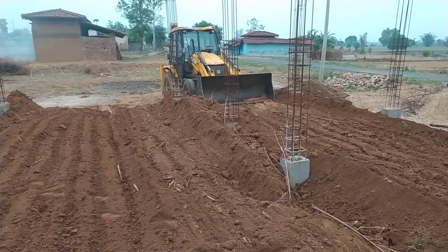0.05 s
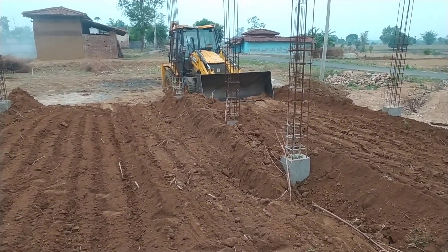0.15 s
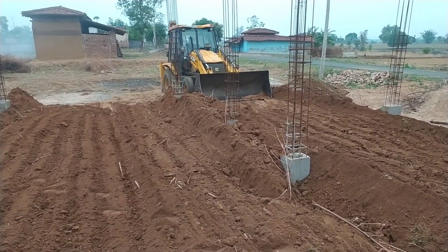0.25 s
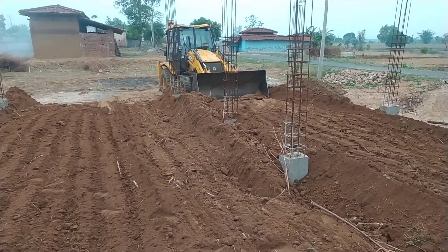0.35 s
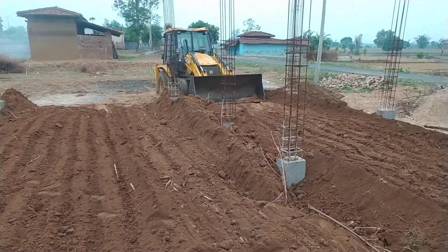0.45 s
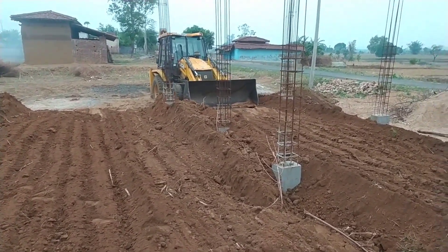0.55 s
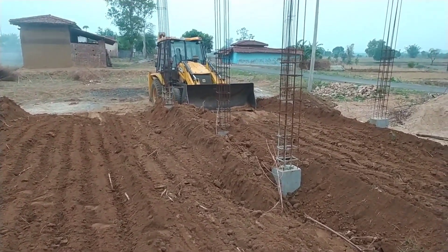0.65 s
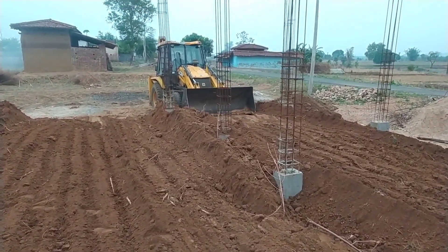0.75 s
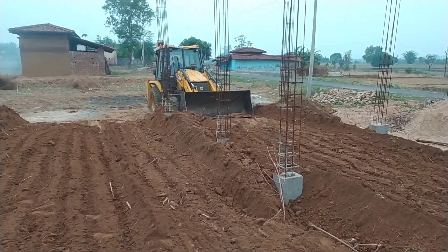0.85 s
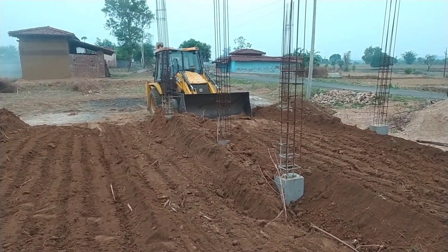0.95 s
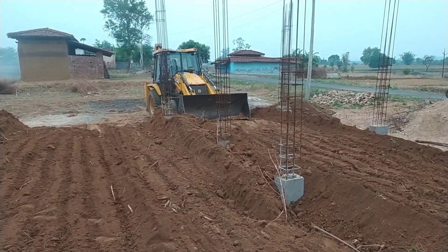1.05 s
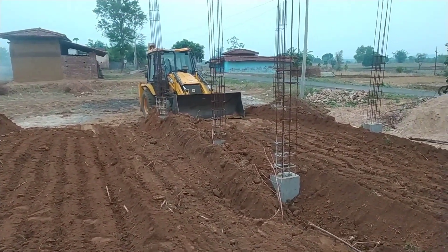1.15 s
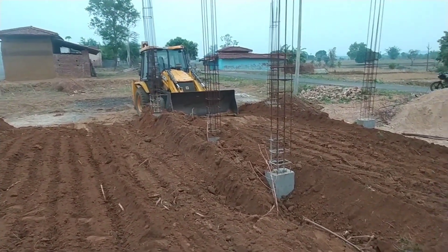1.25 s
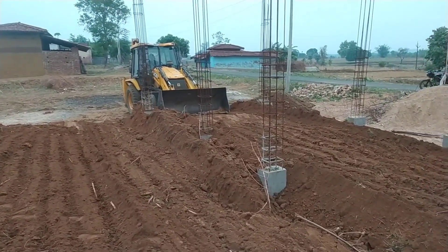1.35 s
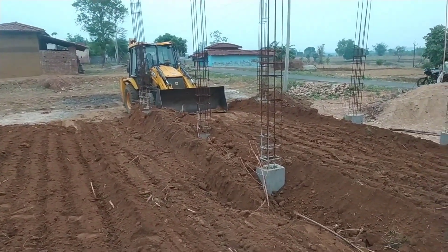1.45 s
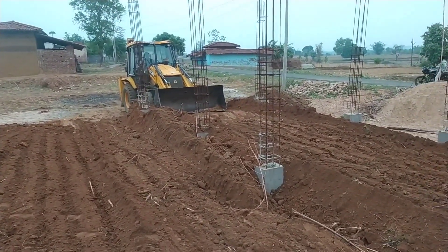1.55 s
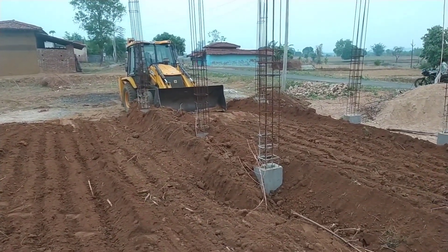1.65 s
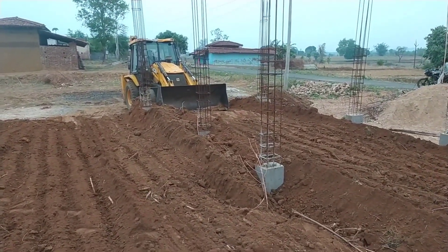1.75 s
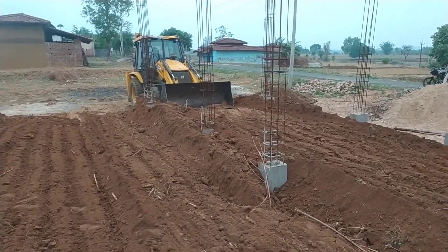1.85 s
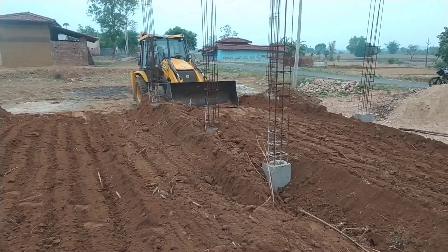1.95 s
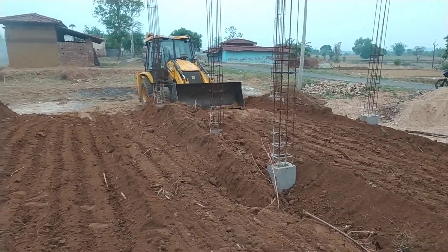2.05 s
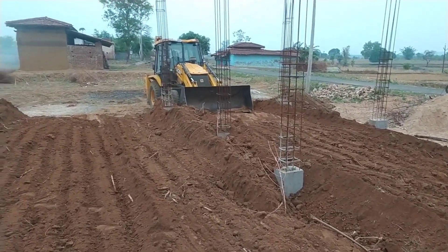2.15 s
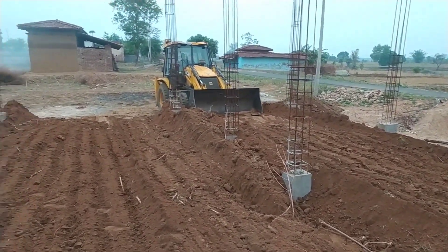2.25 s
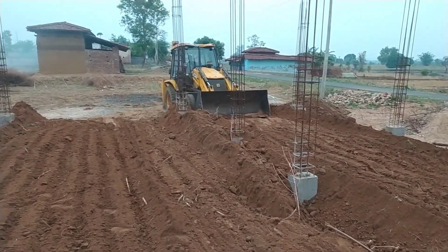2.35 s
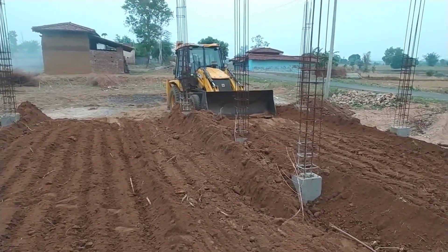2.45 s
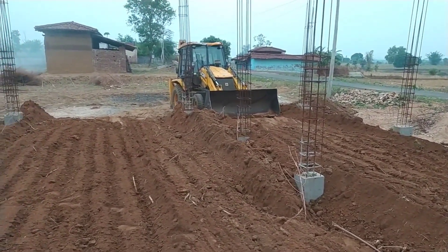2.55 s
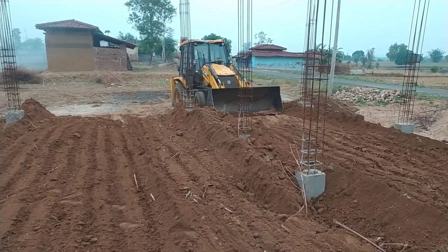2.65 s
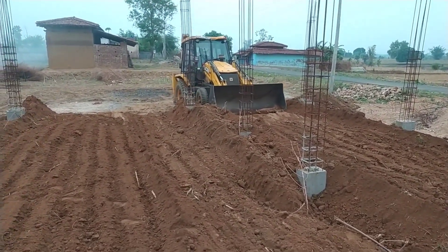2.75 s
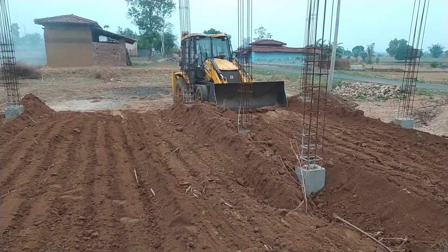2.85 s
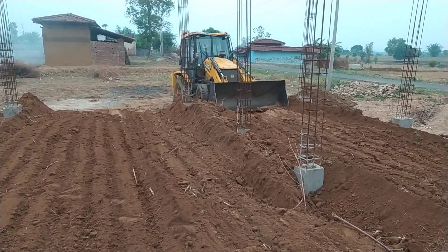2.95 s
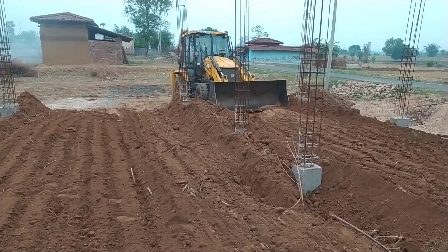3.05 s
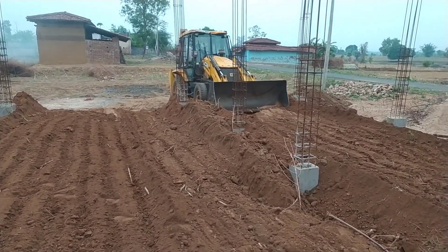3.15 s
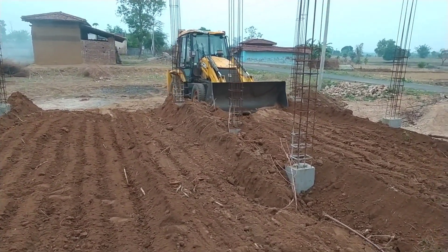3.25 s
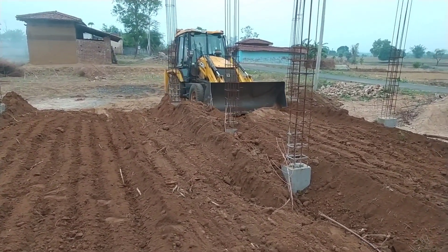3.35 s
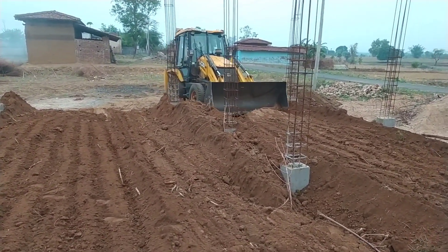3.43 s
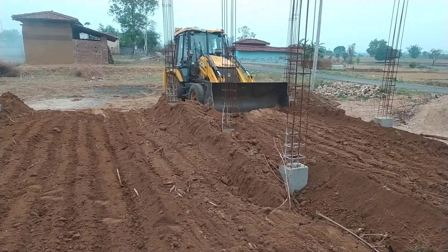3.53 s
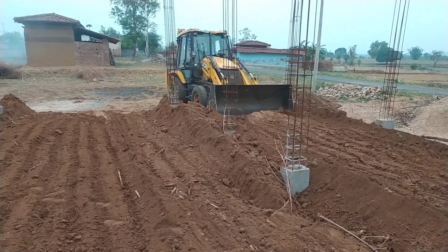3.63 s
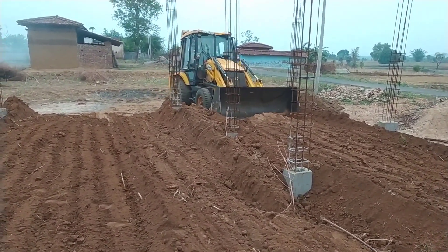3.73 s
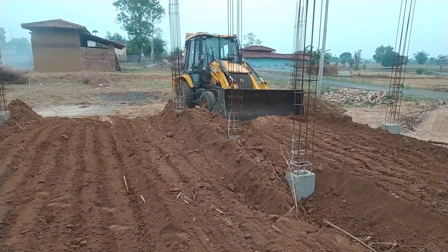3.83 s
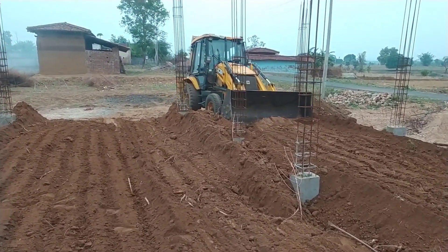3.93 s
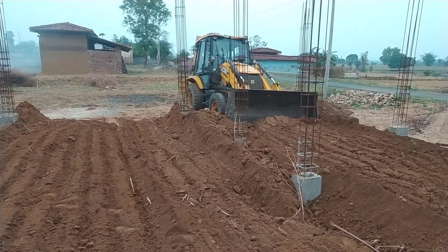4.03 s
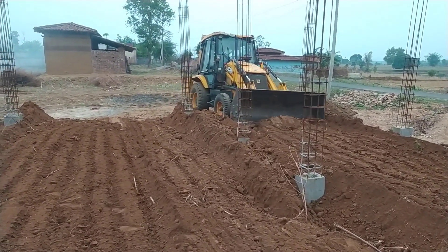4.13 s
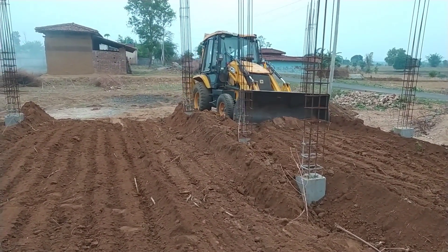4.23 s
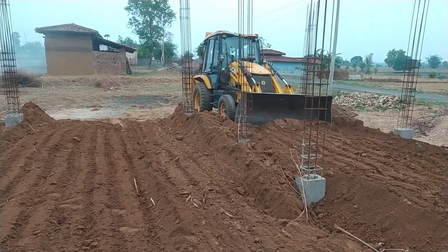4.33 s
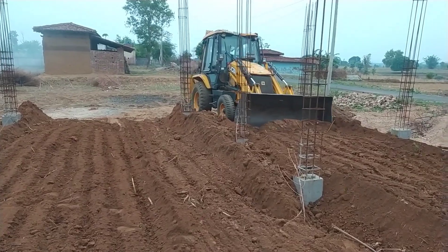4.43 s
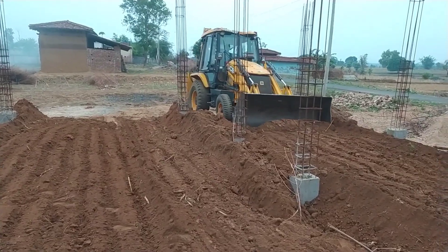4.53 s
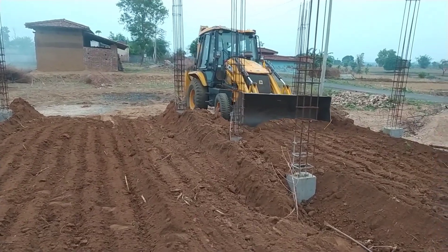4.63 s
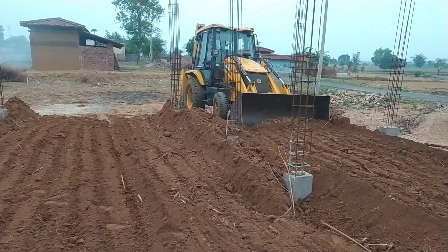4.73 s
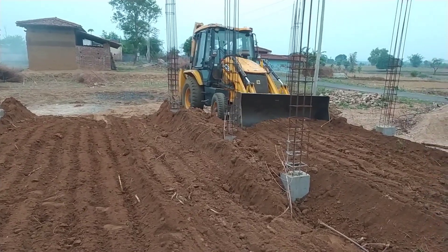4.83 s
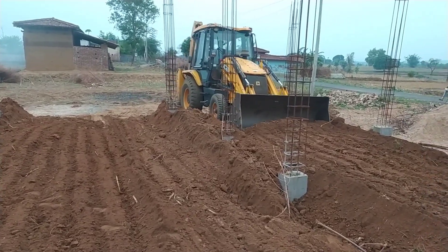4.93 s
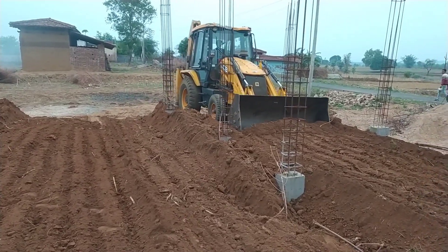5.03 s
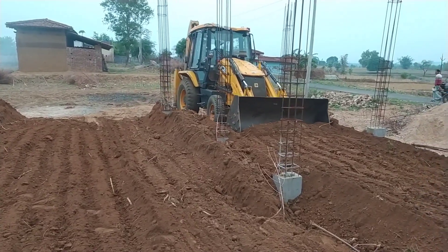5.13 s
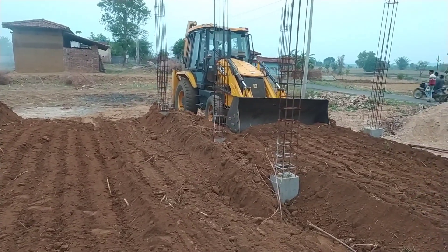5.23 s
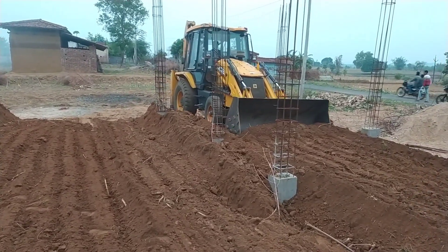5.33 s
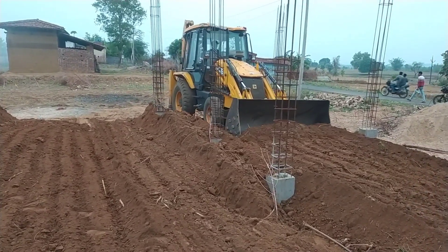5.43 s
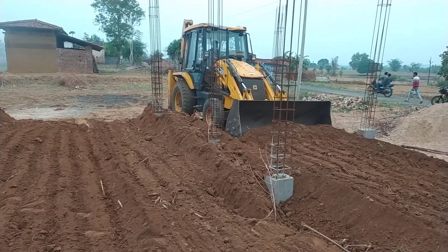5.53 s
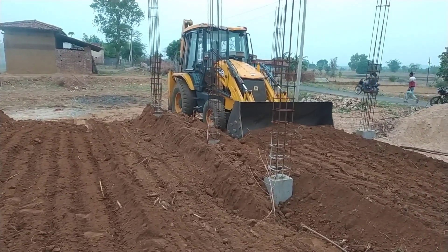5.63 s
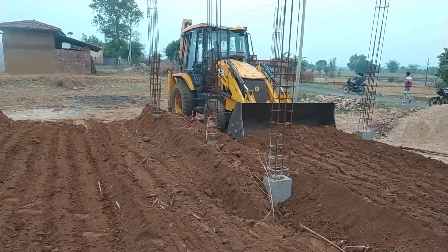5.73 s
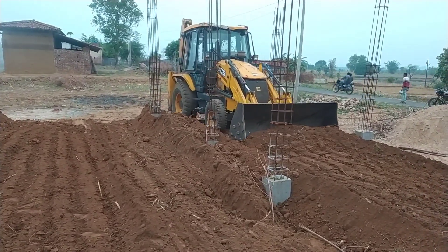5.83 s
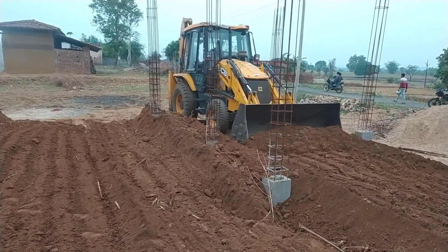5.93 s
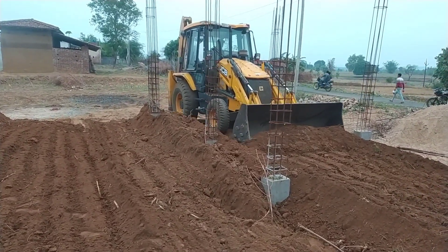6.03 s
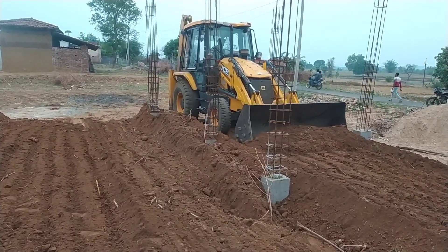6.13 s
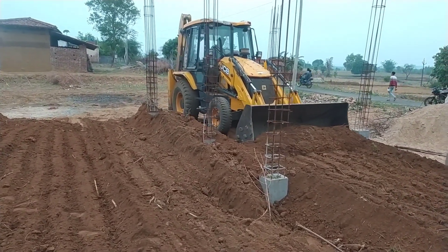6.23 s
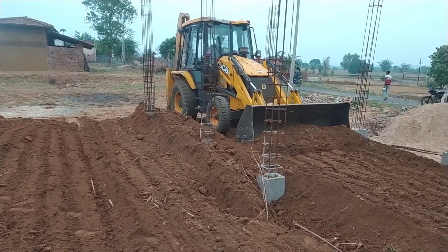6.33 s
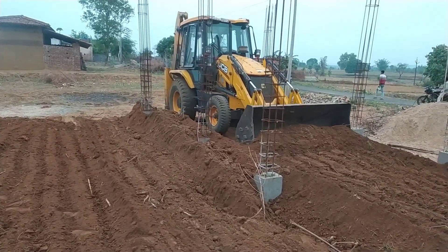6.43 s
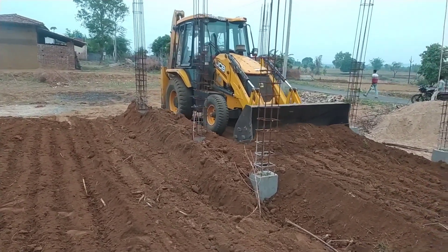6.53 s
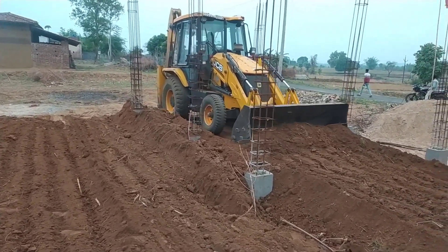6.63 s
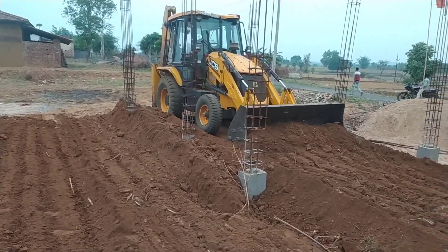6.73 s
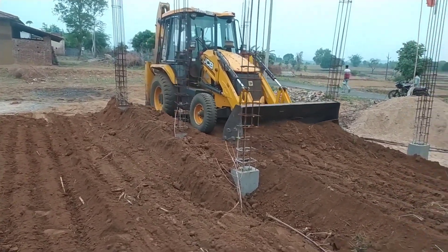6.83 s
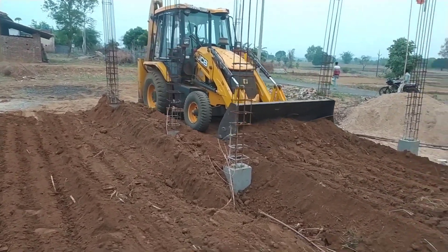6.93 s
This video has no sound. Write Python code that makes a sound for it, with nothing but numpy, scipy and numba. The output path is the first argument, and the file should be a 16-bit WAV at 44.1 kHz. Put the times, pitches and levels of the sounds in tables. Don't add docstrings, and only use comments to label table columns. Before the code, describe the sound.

A diesel loader idles with a low hum and rattle, revs up hard at two seconds, then labours closer with sharper metallic knocking.

```python
import sys
import numpy as np
from scipy import signal
from scipy.fft import rfft, irfft, next_fast_len
from scipy.io import wavfile
from scipy.ndimage import uniform_filter1d
from numba import njit

SR = 44100
rng = np.random.default_rng(int(sys.argv[2]) if len(sys.argv) > 2 else 0)


def persist_wave(psi):
    counts = np.round(np.clip(psi, -1, 1) * 32767).astype(np.int16)
    wavfile.write(sys.argv[1], SR, np.atleast_2d(counts).T)


def boost(x):
    u = np.asarray(x, float) / 20
    return 10 ** u


N = 307818
TIME = np.arange(N) / SR

# (time [s], firing rate [firings/s])
FIRING_RATE = [(0, 39.66), (0.8, 39.69), (1.4, 37.93), (1.5, 39.28), (1.845, 37.9), (1.99, 45.18),
               (2.15, 47.07), (2.4, 55.47), (2.55, 55.8), (3.15, 55.39), (3.8, 55.52), (4.87, 54.95),
               (5.0, 52.65), (5.22, 53.67), (5.53, 56.52), (5.85, 57.24), (6.6, 56.31), (6.98, 57.36)]
# (time [s], extra fuel as combustion bite [dB])
FUEL = [(0, -1), (.55, 3.5), (1.2, 0), (1.75, 0.5), (1.83, 4.5), (1.92, 7), (2.08, 4), (2.16, 5), (2.25, 8),
        (2.33, 4), (2.55, 2), (3.2, 0.5), (4.5, 0.5), (4.72, 1.5), (4.86, 3.5), (5.1, 0.2), (6.3, -.6),
        (6.98, 0.5)]
# (time [s], distance [m])
DISTANCE = [
    (0, 16.6),
    (1.75, 20.2),
    (2.7, 20.2),
    (4.2, 15.8),
    (5.0, 13.3),
    (5.9, 11.1),
    (6.98, 10.9),
]
# (time [s], frequency factor [1])
STRETCH = [(0, .93), (1.8, .93), (2.5, 1), (7, 1.005)]
IDLE_HZ, LOAD_HZ = 40, 54
REFERENCE_M = 20
DIG_S, DIG_RAMP_S = 4.7, 1

# (idle level [dB], rise under load [dB], share of approach [dB/dB], share of fuel [dB/dB],
# change when digging [dB])
HUM_LAWS = [
    (-42.5, 8.5, 0.53, 0.43, 0.9),
    (-44, 6, -0.83, 0.61, 7),
    (-41, 7, 0.42, .15, -3),
]
ROAR_LAW = (-41, 6, 0.54, 0.2, 1.5)
BONNET_LAW = (-38, 8, 1.1, .2, -0.65)
BLOCK_LAW = (-42, 11, 1.03, 0.43, -0.5)
CLATTER_LAW = (-48, 5, 0.68, 0.57, 0.9)
SPIT_LAW = (-53, 9, 1.31, 1, -0.4)

# (multiple of firing rate [1], level re the first at idle [dB], under load [dB])
UNEQUAL_LINES = [(1.25, -22, -18.5), (1.499, -16, -15.5), (1.75, -14, -51), (2.25, -30, -16),
                 (2.502, -10.5, -17), (3.249, -14, -15.5), (3.498, -26, -23), (3.75, -14, -15.5),
                 (4, -6.5, -17.5), (4.749, -7.5, -12.5), (5.252, -4, -57), (5.752, -17, -34)]
# (cylinder 1 [dB], cylinder 2 [dB], cylinder 3 [dB], cylinder 4 [dB])
CYLINDER_DB = [
    (-1, 1, -1, 1),
    (3, 1, 3, -1),
    (2, 4, 0, 1),
    (0, 0, 1, 1),
]
# (cylinder 1 [dB], 2 [dB], 3 [dB], 4 [dB])
PULLING_DB = (-1, 4.5, 1, 0)
EXHAUST_DB, IDLING_DB, BLOCK_DB, TREBLE_DB = CYLINDER_DB

# (frequency [Hz], width [Hz], level [dB])
SILENCER = [(25, 20, -11), (81.6, 78, -6), (156, 78, 2), (205.0, 59, 8.0), (285.7, 55, 3.5)]
# (frequency [Hz], width [Hz], level [dB])
BONNET = [(446, 48, 22), (510, 100, -27), (390, 150, -14)]
# (frequency [Hz], width [Hz], level [dB])
BLOCK = [(1000, 120, -13), (1020, 130, -16), (1258, 255, -4.5), (1600, 460, -17)]
# (frequency [Hz], width [Hz], level [dB])
CLATTER = [(2206, 543, 8), (2710, 130, 9), (2976, 113, 8.5), (3870, 225, -8.5)]
# (frequency [Hz], width [Hz], level [dB])
SPIT = [(4620, 410, 2), (5900, 500, 4), (6900, 700, 1), (7710, 620, 3), (9090, 3060, 1), (12100, 9000, -40)]

# (time [s], peak level [dB], ringing frequency [Hz])
KNOCKS = [(0.412, -16, 410), (0.562, -17, 410), (2.037, -10, 433), (2.142, -11, 458), (2.223, -8.5, 457),
          (2.664, -12, 390), (2.881, -11, 464), (3.274, -4.5, 1150), (3.891, -6.5, 480),
          (4.087, -14.5, 1030), (4.236, -9.5, 1010), (4.394, -15, 447), (4.541, -12, 470),
          (4.672, -8.5, 997), (4.829, -9, 457), (5.204, -5, 450), (5.280, -15, 457), (5.353, -6.5, 476),
          (5.426, -12, 486), (5.566, -6, 430), (5.779, -7, 470), (5.848, -7.5, 480), (6.198, -8, 1000),
          (6.331, -8, 480), (6.409, -4, 448), (6.479, -8.5, 428), (6.503, -6, 438), (6.552, -5, 460),
          (6.764, -11, 437), (6.904, -14, 430)]
# (time [s], peak level [dB],
# frequency [Hz], width [Hz], decay [s])
CLICKS = [(0.334, -36, 9700, 2000, 0.0067), (1.04, -41, 8000, 900, .003),
          (1.287, -29.5, 5540, 3500, 0.0018), (1.6055, -38, 9000, 2000, 0.011),
          (4.643, -29.5, 8450, 1200, 0.0091), (4.694, -15.5, 1070, 120, 0.02),
          (4.788, -25, 4000, 5000, 0.03), (4.859, -18, 1400, 1200, 0.02), (4.9168, -29.5, 8670, 250, .012),
          (4.917, -22.5, 4000, 4000, 0.0036), (5.688, -25, 2310, 500, .005)]
# (time [s], peak level [dB], frequency [Hz], width [Hz], decay [s])
PEBBLES = [
    (0.062, -32, 1680, 600, 0.013),
    (0.158, -35, 1700, 600, 0.0066),
    (0.2623, -25.5, 3940, 600, 0.0015),
    (.2624, -25, 7500, 4000, 0.00082),
    (0.2625, -25, 1990, 800, 0.0012),
    (0.331, -35.5, 3600, 1000, .002),
    (1.185, -27, 1800, 1900, 0.012),
]
# (frequency [Hz], left minus right level [dB], likeness [0-1], common level [dB])
PORTS = [(30, 1.5, 0.87, 2), (310, 1, 0.98, -0.5), (480, 3.5, 0.95, 1.5), (600, 16.5, 0.99, -4.5),
         (720, -10.5, 0, -4.5), (900, 2, 1, 2), (1530, 2.5, 0.65, -1), (1654, 13.5, 0.75, -4),
         (2090, -1.5, 0.34, -7), (4000, 0.5, 0.35, -4), (7500, 1.5, 0.06, -3), (9390, -17.5, 0.06, -3.5),
         (13100, -12.5, 0.5, -14.5), (16000, -10, .2, -15)]


def exhaust(controls, turns):
    return np.sqrt(2) * exhaust_hum(controls, turns) + exhaust_roar(controls, turns)


def exhaust_hum(controls, turns):
    load, _, _, digging = controls
    governed_hz, sag_db_per_hz = 55.7, 0.66
    order_db = [follow(law, controls) for law in HUM_LAWS]
    rate = np.gradient(turns) * SR
    order_db[0] += sag_db_per_hz * (digging > 0) * (rate - governed_hz)

    beat = 2 * np.pi * (turns - .63)
    lead = [0, 0, .5 + 2.3 * load]
    hum = np.zeros(N)
    for k, db in enumerate(order_db):
        hum -= boost(db) * np.cos((k + 1) * beat + lead[k])
    for multiple, idle_db, load_db in UNEQUAL_LINES:
        line_db = order_db[0] + idle_db + load * (load_db - idle_db)
        hum += boost(line_db) * np.cos(multiple * beat + 2 * np.pi * rng.random())
    fourth_db = order_db[0] - 7
    return hum + boost(fourth_db) * digging * np.cos(4 * beat)


def exhaust_roar(controls, turns):
    puffs = bursts(turns, 0.63, 0.13, EXHAUST_DB, 4.6, 0.81) * rng.standard_normal(N)
    roar = resonate(puffs, SILENCER, 0.876 + 0.14 * controls[0])
    return boost(follow(ROAR_LAW, controls) - 0.5) * roar


def body(controls, turns):
    load, _, fuel_db, _ = controls
    bonnet_db = follow(BONNET_LAW, controls)
    block_db = follow(BLOCK_LAW, controls)
    flutter_db = 1.1 * walk(16)
    clatter_db = follow(CLATTER_LAW, controls) + .6 * flutter_db
    spit_db = follow(SPIT_LAW, controls) + flutter_db
    steady_share = .58 - .05 * fuel_db
    stretch, = columns(STRETCH)

    idling = bursts(turns, .2, .15, IDLING_DB, 2, .45)
    pulling = bursts(turns, -.05, .24, PULLING_DB, 1.5, .6)
    bonnet = knock_hush() * (idling + load * (pulling - idling))
    low_block = bursts(turns, .08 - .16 * load, .2, BLOCK_DB, 1.5, .5)
    high_block = bursts(turns, 0.011, 0.13, TREBLE_DB, 2, 0.93)
    valves = bursts(turns, 0.9, 0.28, TREBLE_DB, 2, steady_share + 0.2)
    low_spit = bursts(turns, 0.85, 0.38, TREBLE_DB, 2, steady_share + 0.017)
    high_spit = bursts(turns, 0.89, 0.26, TREBLE_DB, 2, steady_share)

    layers = [(BONNET, bonnet_db, bonnet),
              (BLOCK[:2], block_db - 3.5, low_block),
              (BLOCK[2:], block_db - 5.0, high_block),
              (CLATTER, clatter_db + 8.0, valves),
              (SPIT[:3], spit_db - 0.5, low_spit),
              (SPIT[3:], spit_db, high_spit)]
    paths = np.zeros((2, N))
    for modes, db, envelope in layers:
        for path in paths:
            path += boost(db) * resonate(envelope * rng.standard_normal(N), modes, stretch)
    return paths


def knock_hush():
    hush, length_s = .65, .011
    taken = np.zeros(N)
    for s, _, hz in KNOCKS:
        if hz < 600:
            taken += np.exp(-((TIME - s) / length_s) ** 2)
    return 1 - hush * taken


def knocks():
    out, t = np.zeros(N + 4096), np.arange(4096) / SR
    swell = np.sin(np.pi / 2 * np.minimum(t / .006, 1)) ** 2
    block = np.sin(2 * np.pi * BLOCK[0][0] * t) * np.exp(-t / 0.0064)
    for s, db, hz in KNOCKS:
        panel = np.sin(2 * np.pi * hz * t) * np.exp(-t / 0.0075)
        start = int((s - .002) * SR)
        out[start:start + 4096] += boost(db + 0.3) * swell * (panel + 0.2 * block)
    return out[:N]


def clicks():
    out = np.zeros((2, N + 4096))
    for event in PEBBLES:
        add_click(out, event, 12.5)
    port_hz, port_db = np.transpose(PORTS)[:2]
    for event in CLICKS:
        add_click(out, event, np.interp(event[2], port_hz, port_db))
    return signal.sosfilt(signal.butter(6, 10500, fs=SR, output="sos"), out[:, :N])


def add_click(out, event, pan_db):
    s, db, hz, width, length = event
    tick = rng.standard_normal(4096) * np.exp(-np.arange(4096) / SR / length)
    centre = np.full(4096, 1. * hz)
    tick = svf(svf(tick, centre, 1. * width), centre, 2. * width)
    tick *= boost(db) / np.abs(tick).max()
    start = int(s * SR)
    out[:, start:start + 4096] += tick * boost(np.array([[pan_db], [-pan_db]]) / 2)


def bursts(turns, late, decay, cylinder_db, scatter_db, share):
    firing, phase = np.divmod(turns - late + 4, 1)
    firing = firing.astype(int)
    db = np.asarray(cylinder_db)[firing % 4] + scatter_db * rng.standard_normal(1000)[firing]
    swell = boost(db) * (phase / decay) ** 2 * np.exp(2 - 2 * phase / decay)
    share = np.clip(share, 0, 1)
    return share + (1 - share) * 2 * uniform_filter1d(swell, size=130)


def resonate(x, modes, stretch):
    total = np.zeros(len(x))
    for k, (hz, width, db) in enumerate(modes):
        total += (-1) ** k * boost(db) * svf(x, hz * stretch, 1. * width)
    return steady(total)


@njit
def svf(x, hz, width):
    y, band, low = np.empty(len(x)), 0., 0.
    for i in range(len(x)):
        g, k = np.tan(np.pi * hz[i] / SR), width / hz[i]
        v = (band + g * (x[i] - low)) / (1 + g * (g + k))
        band, low, y[i] = 2 * v - band, low + 2 * g * v, k * v
    return y


def steady(x):
    return x / np.sqrt(uniform_filter1d(x ** 2, size=SR // 2) + 1e-18)


def follow(law, controls):
    return law[0] + np.dot(law[1:], controls)


def columns(table):
    s, *rest = np.transpose(table)
    return [np.interp(TIME, s, c) for c in rest]


def walk(rate_hz):
    hold = int(SR / rate_hz)
    held = np.repeat(rng.standard_normal(400), hold)[:N]
    return 1.2 * uniform_filter1d(held, hold)


def microphone_pair(direct, other):
    lag_s, lag_from_hz = 0.00021, 630
    size = next_fast_len(N + 4096)
    hz = np.arange(size // 2 + 1) * SR / size
    port_hz, *rest = np.transpose(PORTS)
    pan_db, alike, db = (np.interp(np.log(hz + 1), np.log(port_hz), c) for c in rest)
    alike = np.clip(alike, 0, 1)

    right = rfft(direct, size)
    late = np.exp(-2j * np.pi * lag_s * np.maximum(hz - lag_from_hz, 0))
    left = late * (alike * right + np.sqrt(1 - alike ** 2) * rfft(other, size))
    pair = np.array([left * boost(db + pan_db / 2), right * boost(db - pan_db / 2)])
    return irfft(pair, size)[:, :N]


def scene():
    rate, = columns(FIRING_RATE)
    distance, = columns(DISTANCE)
    fuel_db, = columns(FUEL)
    turns = np.cumsum(rate) / SR
    load = np.clip((rate - IDLE_HZ) / (LOAD_HZ - IDLE_HZ), 0, 1)
    approach_db = 20 * np.log10(REFERENCE_M / distance)
    digging = np.clip((TIME - DIG_S) / DIG_RAMP_S, 0, 1)
    controls = np.array([load, approach_db, fuel_db, digging])

    near, other = body(controls, turns)
    direct = near + exhaust(controls, turns) + knocks()
    return microphone_pair(direct, other) + clicks()


def roll_off(x):
    return signal.sosfilt(signal.butter(12, 15200, fs=SR, output="sos"), x)


def record(dry):
    mix = signal.sosfilt(signal.butter(2, 22, "high", fs=SR, output="sos"), dry)
    return roll_off(mix)


dry = scene()
out = record(dry)
persist_wave(out)
```